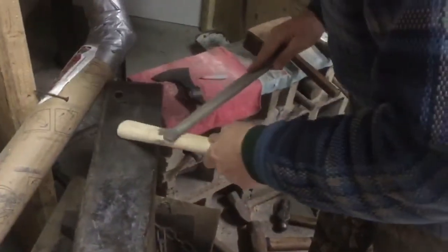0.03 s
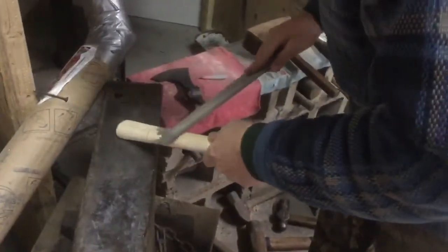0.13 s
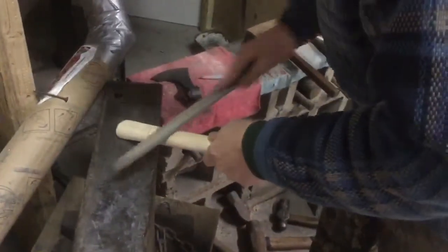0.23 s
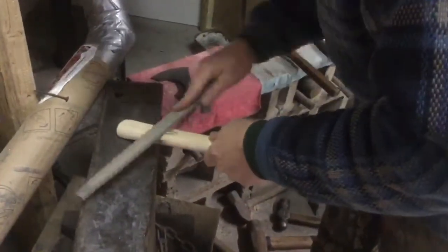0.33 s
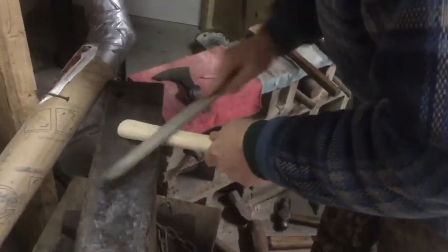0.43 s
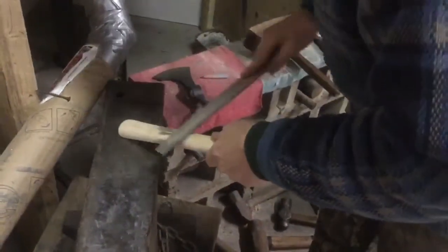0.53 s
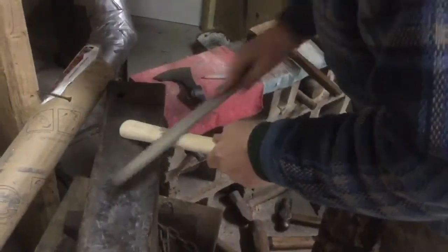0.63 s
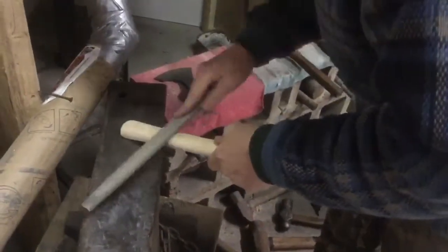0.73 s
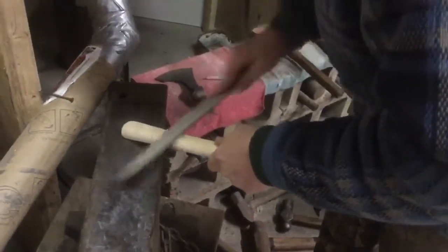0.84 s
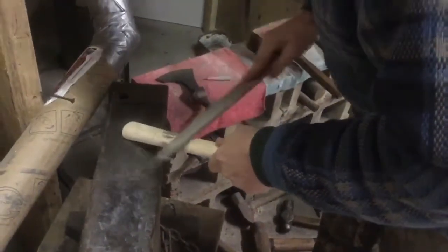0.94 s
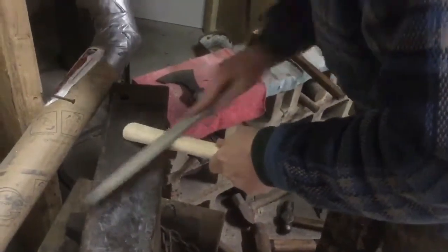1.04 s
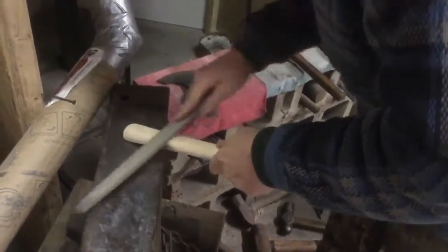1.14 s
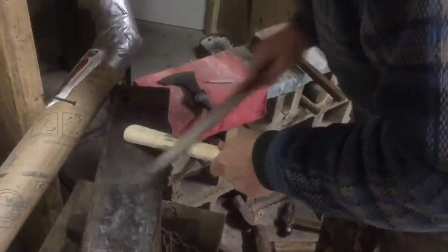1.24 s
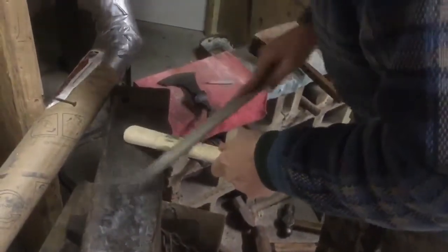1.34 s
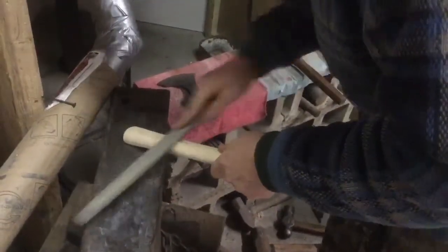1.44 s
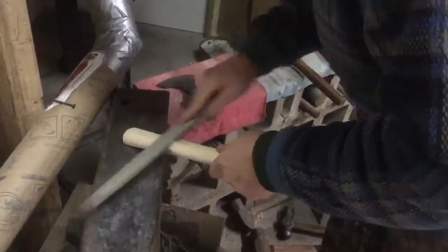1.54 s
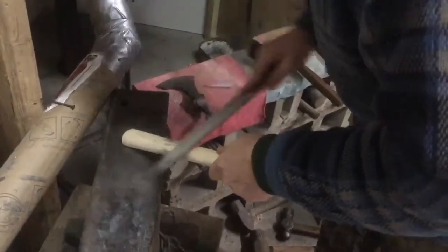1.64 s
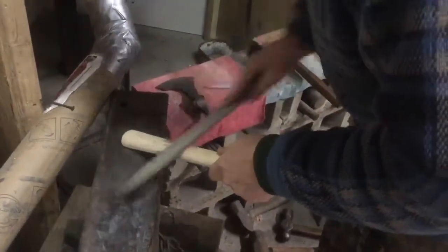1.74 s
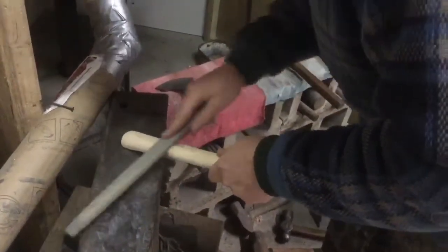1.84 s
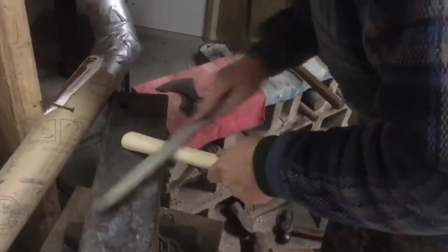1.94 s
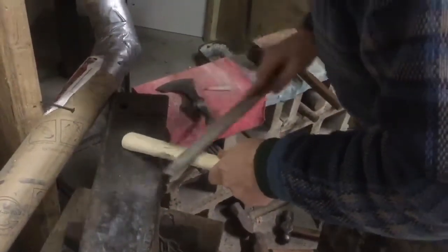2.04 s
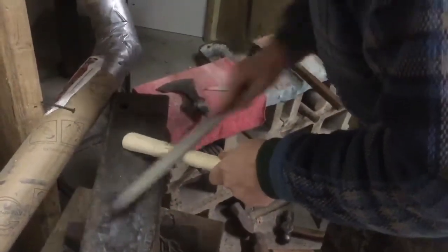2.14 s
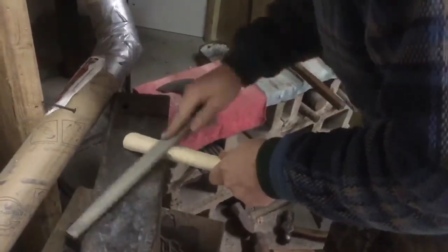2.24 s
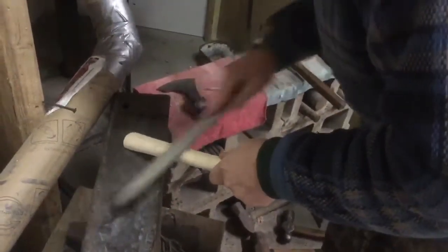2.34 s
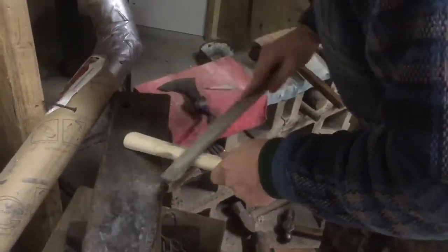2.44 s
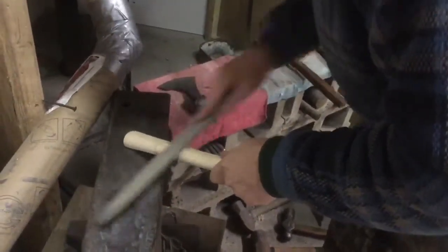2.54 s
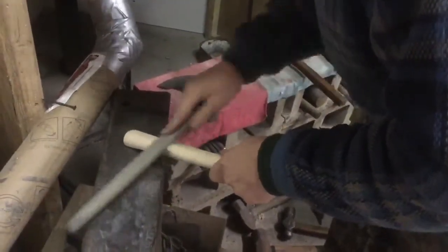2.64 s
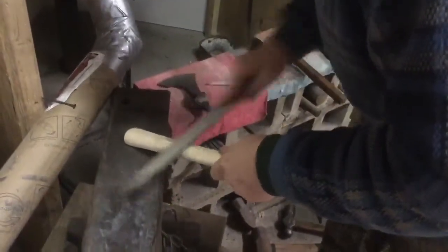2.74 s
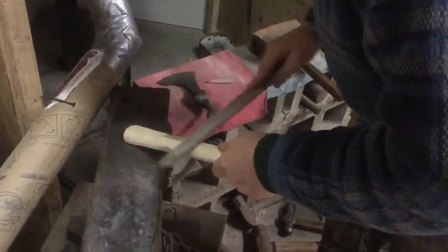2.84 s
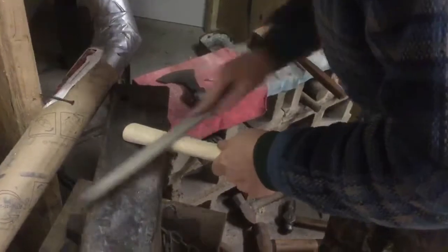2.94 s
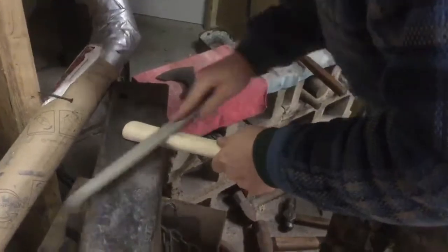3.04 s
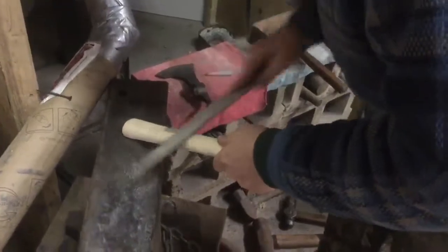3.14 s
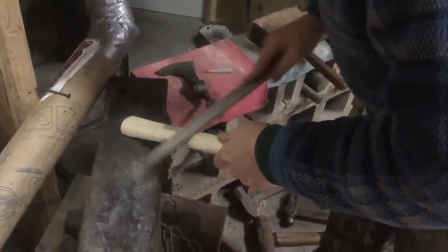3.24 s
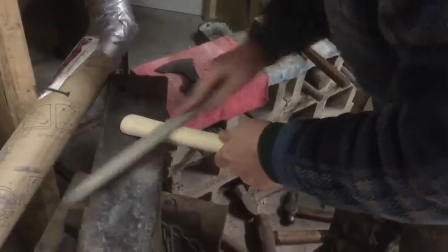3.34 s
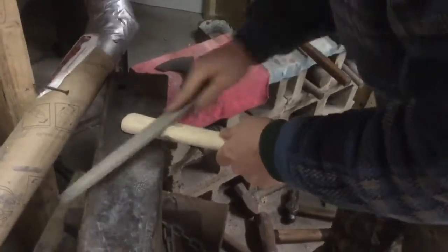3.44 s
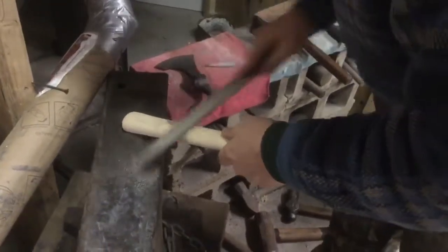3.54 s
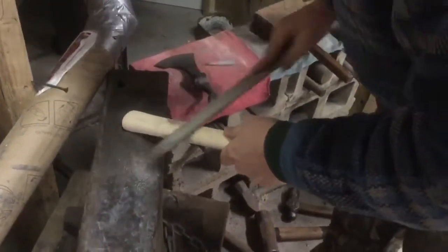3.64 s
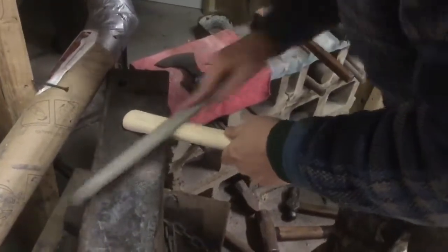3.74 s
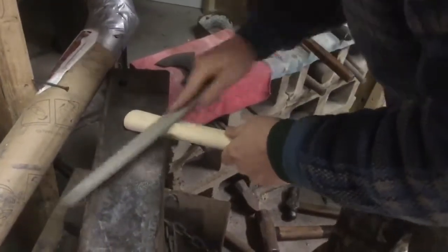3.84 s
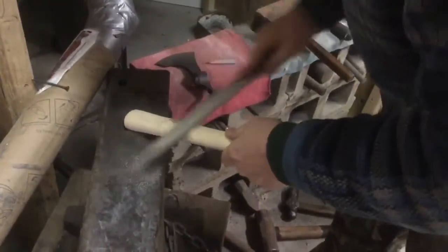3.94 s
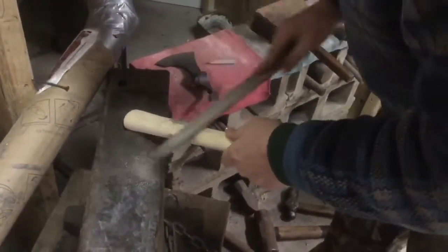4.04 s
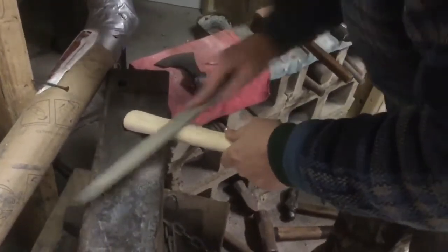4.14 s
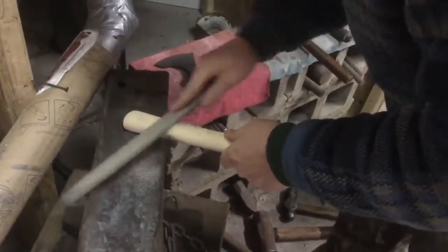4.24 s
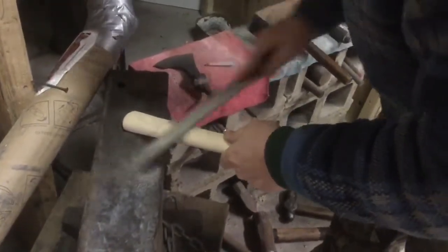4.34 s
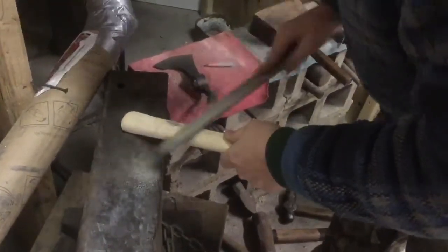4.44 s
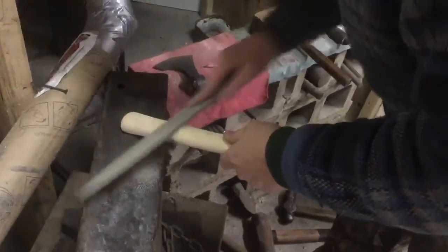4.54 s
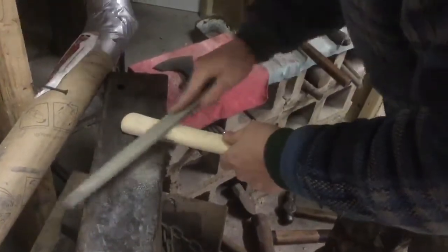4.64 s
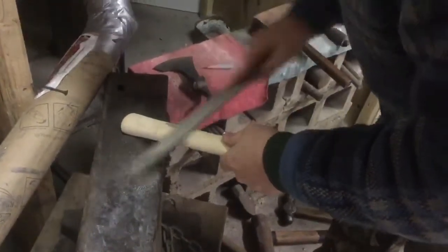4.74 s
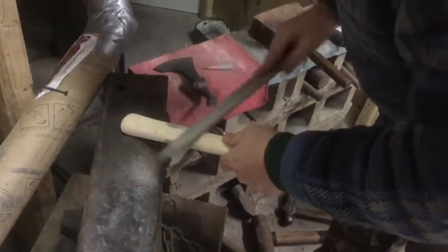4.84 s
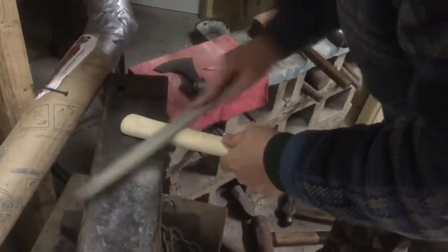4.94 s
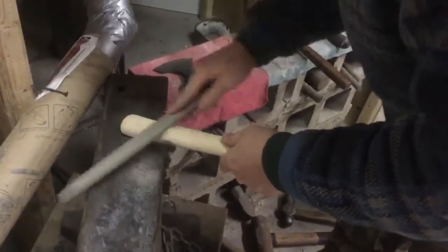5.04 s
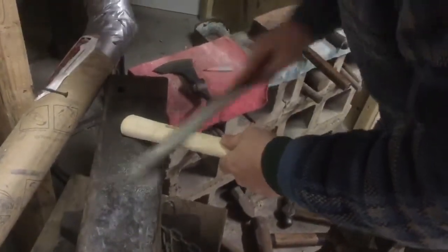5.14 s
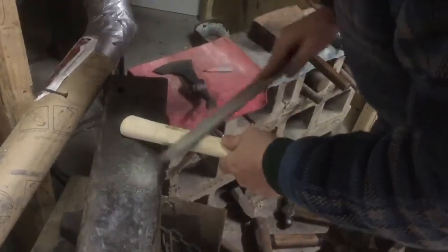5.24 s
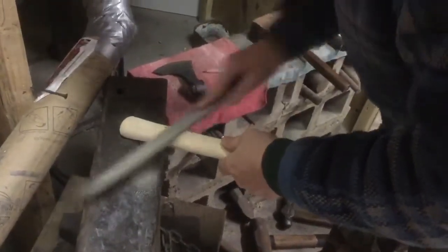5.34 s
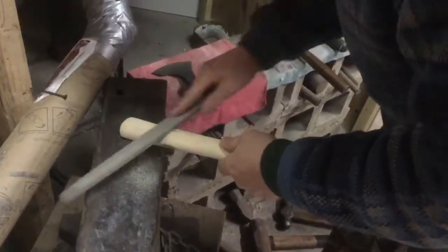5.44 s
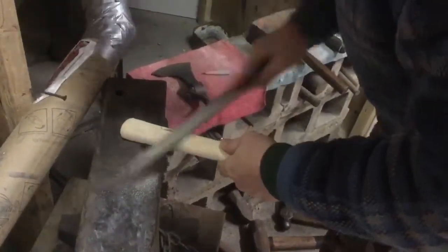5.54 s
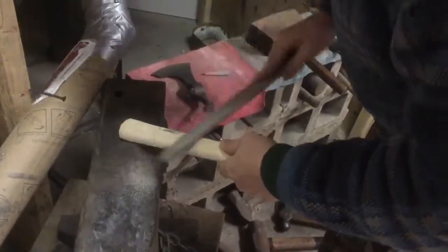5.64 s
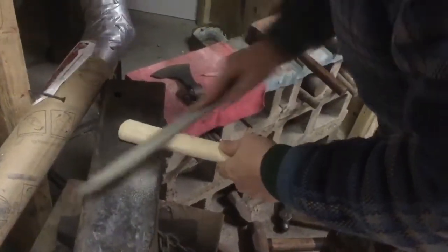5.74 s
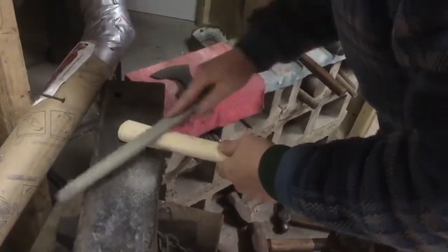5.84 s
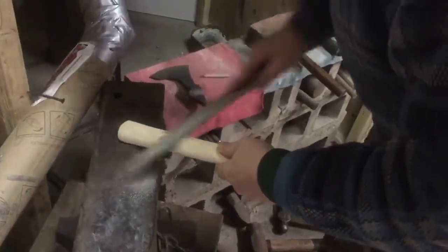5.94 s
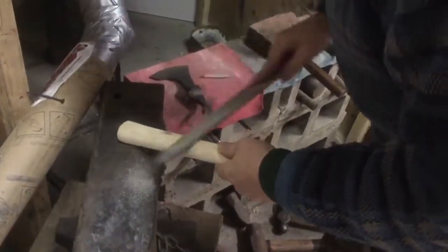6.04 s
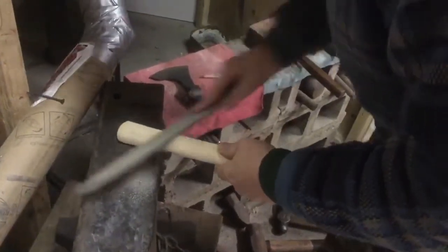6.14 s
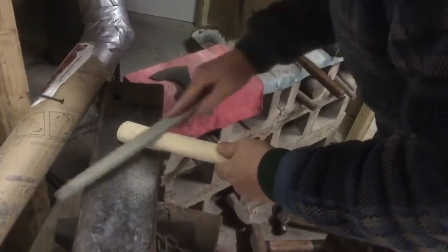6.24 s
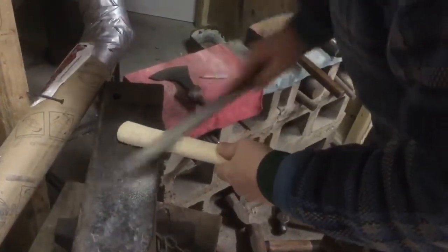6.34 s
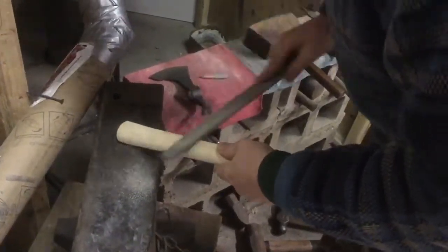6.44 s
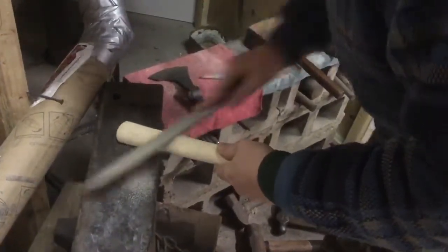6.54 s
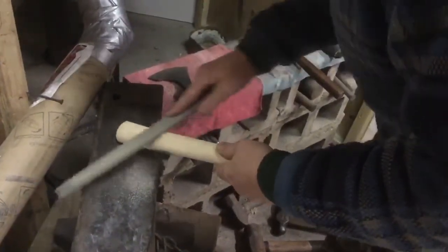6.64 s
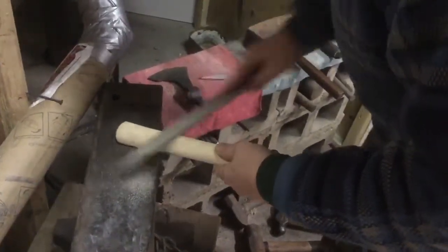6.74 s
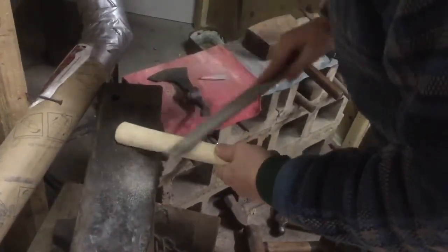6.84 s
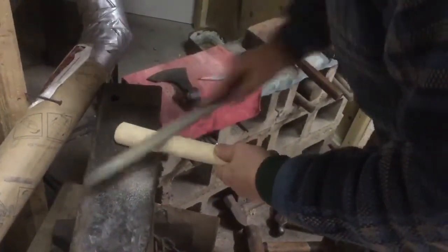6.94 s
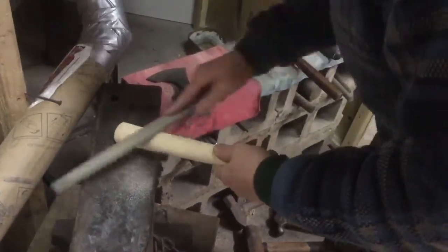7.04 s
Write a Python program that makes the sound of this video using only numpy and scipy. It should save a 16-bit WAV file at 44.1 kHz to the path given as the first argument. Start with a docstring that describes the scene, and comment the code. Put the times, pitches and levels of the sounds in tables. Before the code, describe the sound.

Close, steady strokes of a steel file scraping wood in a small workshop, alternating loud and soft, with occasional tiny squeaks.

```python
"""Filing a wooden handle

A small workshop, one microphone close to the anvil, where a long hand file rasps to and fro over a
wooden handle. The teeth bite in and tear fibres, hard on the push and lighter on the pull; handle and
steel blade ring with them. The file is first set down with a tap; now and then its teeth catch in step
and chirp. Underneath, the handle bumps and rolls on the anvil, and the room murmurs faintly."""
import sys
import numpy as np
from scipy import signal
from scipy.fft import rfft, irfft, next_fast_len
from scipy.io import wavfile
from scipy.ndimage import uniform_filter1d

SR = 44100
rng = np.random.default_rng(int(sys.argv[2]) if len(sys.argv) > 2 else 0)


def dump(signal):
    """Clip the signal to [-1, 1] and save it as 16-bit WAV at the path in sys.argv[1]."""
    limited = np.clip(np.atleast_2d(signal).T, -1, 1)
    pcm = np.round(limited * 32767).astype(np.int16)
    wavfile.write(sys.argv[1], SR, pcm)


N = 313110
TIME = np.arange(N) / SR
FFT_SIZE = next_fast_len(N + SR)
HZ = np.maximum(np.arange(FFT_SIZE // 2 + 1) * SR / FFT_SIZE, 1)

# The strokes, push and pull in turn. Each row: start in seconds, level in dB, pressure gained from
# start to end in dB, lift of the blade's note near 1 kHz in dB.
FILE_STROKES = [(.122, -23, -3, 4.5), (.394, -31.5, -2, 1), (.576, -22.5, 0, 1.5), (.776, -31.5, -1, -0.5),
                (.951, -20.5, -4.5, 0.5), (1.142, -29.5, -5, 6), (1.318, -22.5, -10.5, 1),
                (1.516, -30.5, -2.5, -0.5), (1.7, -21, -4.5, -1), (1.895, -31, 0.5, 3.5),
                (2.078, -22.5, -8, 2.5), (2.283, -31.5, 3, 3), (2.457, -23.5, -7, 5),
                (2.658, -31.5, -2.5, -5), (2.85, -22.5, -7, 1), (3.048, -29.5, 3, -3),
                (3.229, -24.5, -5.5, -1), (3.436, -30.5, -4, -12.5), (3.631, -22.5, -8, -2),
                (3.841, -31, -8.5, -5), (4.036, -22, -3.5, 1), (4.241, -30.5, -4, -6),
                (4.439, -23.5, -2.5, 2.5), (4.647, -29.5, 2, -10), (4.84, -24, 2, -1),
                (5.046, -28, 3, -11.5), (5.239, -23.5, -7, 1), (5.45, -29.5, -1.5, -7.5),
                (5.647, -23.5, -1.5, 2.5), (5.848, -30.5, 5, -5.5), (6.042, -23, -3.5, -1),
                (6.251, -30, 0.5, -14), (6.447, -22.5, -7.6, -1), (6.658, -30, 1.5, -7.5),
                (6.856, -22.5, -0.5, -2), (7.062, -25, 9, -3)]
# The arm's gesture, push first, then pull. Each row: attack as a share of the stroke, its curve as an
# exponent, release as a share, its exponent, share of the stroke gone at top speed.
ARM_GESTURES = [(0.69, 0.96, 0.39, 1.22, .48), (0.56, 0.62, 0.16, 1.84, .53)]
# How pushes and pulls change as the work goes on. Each row: time in seconds, teeth per second at top
# speed, handle rumble in dB, lift near 2 kHz in dB, brightness in dB per octave.
PUSH_CHARACTER = [(.25, 680, -10.5, -3.5, -2.4), (1.4, 896, -8.5, 2.5, -0.8), (2.6, 904, -11.5, 1.5, -1.5),
                  (3.8, 860, -5.5, -0.5, -1.1), (5.35, 730, -2, 0, -0.4), (7, 710, -1.5, -3, -0.9)]
PULL_CHARACTER = [(.5, 1071, 2.5, -1, 1), (1.25, 1063, 2.5, 0.93, 0.95), (2.4, 1033, 1, 0.88, 1.7),
                  (3.5, 1010, 1.5, 1, 1.2), (4.7, 962.4, 2, 0.053, 0.37), (5.9, 949, 2, -1.96, 1.1),
                  (6.9, 1018, 3, -1.62, 1.92)]
# Broad colour of tearing fibres. Each row: frequency in Hz, relative level in dB on push, then on pull.
FIBRE_COLOUR = [(50.0, -101, -85), (127, -64, -74), (307, -58.5, -57.5), (410, -69, -69),
                (823, -64.5, -71.5), (1434, -57, -54.5), (2690, -44, -43), (4360, -31.5, -36),
                (5500, -47, -48.5), (7160, -53.5, -63.5), (9600, -66, -74.5), (12000.0, -69, -84),
                (15500.0, -75, -110.3)]
# Modes of handle and blade. Each row: frequency in Hz, width in Hz, lift in dB on push, then on pull.
WORK_MODES = [(156.6, 23.6, 17.5, -3), (308.3, 44, 12, 7), (574, 76.2, 24.5, 17.5), (997, 79, 4, 30),
              (1138, 136, 10.5, 2), (1479, 53, 10.5, 9), (1750, 131, 14.5, 4), (2085, 218, 4, 11.5),
              (2335, 172, 8, -4.5), (3130, 240, 3, 4.5), (3540, 370, 5, 2), (3900, 125, -3.5, 6),
              (4314, 153, -23, -6), (4350, 36, 4, 9), (6048, 197, 11, 10.5), (7133, 234, 9, 18),
              (7660, 110, 7, 4.5), (8130, 85, 13, 16), (8820, 150, 11, 11), (10177, 200, 10.5, 12.5),
              (12430, 300, 10, 12.5), (14500, 470, 8, 22.5)]
# Blade resonances that swell as the contact slides over their belly. Each row: frequency in Hz,
# width in Hz, share of the stroke gone at the swell, lift in dB.
PUSH_BLADE_MODES = [(1174, 90, 0.11, 6.5), (1450, 116, 0.42, 7), (1730, 37, 0.66, 2.5),
                    (2386, 160, 0.14, 12), (2556, 230, 0.46, 8), (3770, 570, 0.59, 2), (3980, 220, 0.76, 6),
                    (4480, 480, 0.04, 10), (4890, 82, 0.95, 7)]
PULL_BLADE_MODES = [(990, 70, 0.83, 5.2), (2048, 130, 0.7, 10.1), (2550, 160, 0.54, 10.8),
                    (2896, 140, .27, 10.8), (3695, 220, 0.85, 8.1), (4300, 140, 0.26, 8)]
# Teeth catching in step. Each row: start and end in seconds, first, middle and last pitch in Hz,
# level in dB.
TOOTH_CHIRPS = [(0.239, 0.338, 1516, 1340, 1126, -34.5), (.330, 0.353, 1900, 1780, 1610, -37.5),
                (.640, 0.708, 1372, 1514, 1460, -48), (1.042, 1.101, 2687, 2308, 1700, -31),
                (1.203, 1.251, 997, 1030, 1070, -36), (1.428, 1.47, 2780, 2380, 1560, -24),
                (1.804, 1.866, 2476, 2269, 1746, -40), (2.339, 2.434, 2350, 2637, 1814, -35.5),
                (2.501, 2.549, 2120, 2430, 2507, -27), (2.787, 2.817, 2380, 2045, 1750, -30.5),
                (3.281, 3.33, 1525, 1461, 1412, -41), (3.335, 3.382, 1722, 1824, 1995, -32),
                (3.909, 4.033, 934, 1036, 1160, -44), (6.078, 6.206, 1558, 1428, 1456, -39)]
# The file knocks on the wood. Each row: time in seconds, peak in dB.
FILE_TAPS = [(0.0321, -15), (0.068, -36), (2.739, -29)]
# The handle shifts on the anvil. Each row: time in seconds, peak in dB, pitch in Hz.
HANDLE_BUMPS = [(0.874, -48, 169.6), (2.985, -48, 187.7), (3.479, -38.5, 207.7)]


def rasp(push_db, pull_db, zip_db, judder_db):
    """The file, close up: buzzing teeth and tearing fibres set handle and blade ringing."""
    stroke, gone, speed = arm()
    top_tooth_hz, *tone_trends = trends(stroke)
    bite_db = bite(stroke, gone, waver_db=0.93, waver_hz=22, turn_db=-47, settle_s=.1, settle_db=-14)
    pushing = uniform_filter1d(1. - stroke % 2, size=400)
    pulling = 1 - pushing
    phase, buzz = tooth_buzz(top_tooth_hz * speed, jitter=0.01593, buzz_db=-13, fall_db=2, flutter_db=4.5)
    snaps = fibres(speed, phase, snaps_per_s=6000, spread_db=2, hiss_db=-1, tooth_depth=0.21)
    tearing = buzz * np.sqrt(speed) + snaps
    drive = stroke_tone(tearing, stroke, speed, pushing, bite_db, tone_trends, patchy_db=1.76)
    drive = drive * from_db(bite_db + judder_db * drift(83))
    push = filtered(drive * pushing, work_response(direction=0))
    pull = filtered(drive * pulling, work_response(direction=1))
    push = blade(push, PUSH_BLADE_MODES, stroke, gone, reach=.22, detune=.032, scatter_db=3, glide=.21)
    pull = blade(pull, PULL_BLADE_MODES, stroke, gone, reach=.16, detune=.045, scatter_db=5.5, glide=.16)
    whine = zipping(gone, top_hz=4360, top_share=0.42, sag_hz=380, width_hz=130, from_s=3.9, full_s=7.7)
    return from_db(push_db) * push + from_db(pull_db) * pull + from_db(zip_db + bite_db) * pulling * whine


def arm():
    """Stroke number, share of it gone, and speed 0-1: still at each turn, fastest near halfway."""
    turns = np.array(FILE_STROKES)[:, 0]
    turns = np.append(turns, turns[-1] + np.mean(np.diff(turns)))
    travel = np.interp(TIME, turns, np.arange(len(turns)))
    stroke, gone = travel.astype(int), travel % 1
    skew = np.log(.5) / np.log(np.array(ARM_GESTURES)[:, -1])
    return stroke, gone, np.sin(np.pi * gone ** skew[stroke % 2])


def trends(stroke):
    """The slowly changing tooth rate and tone of the push or the pull, whichever is under way."""
    def follow(table):
        times, *columns = np.transpose(table)
        return [np.interp(TIME, times, column) for column in columns]
    return np.where(stroke % 2, follow(PULL_CHARACTER), follow(PUSH_CHARACTER))


def bite(stroke, gone, waver_db, waver_hz, turn_db, settle_s, settle_db):
    """How hard the teeth bite, in dB: the wavering hand bears down, then lets go before the turn."""
    _, level_db, lean_db, _ = np.array(FILE_STROKES)[stroke].T
    attack, attack_curve, release, release_curve, _ = np.array(ARM_GESTURES)[stroke % 2].T
    shape = ease(gone / attack) ** attack_curve * ease((1 - gone) / release) ** release_curve
    pressure = from_db(level_db + lean_db * (gone - .5) + waver_db * drift(waver_hz))
    contact = np.hypot(pressure * shape, from_db(turn_db))   # the file still drags as it turns
    easing_in_db = settle_db * np.maximum(1 - (TIME - FILE_STROKES[0][0]) / settle_s, 0)
    return 20 * np.log10(contact) + easing_in_db


def tooth_buzz(tooth_hz, jitter, buzz_db, fall_db, flutter_db):
    """Each row of teeth plucks the wood: a rough buzz that rises and falls with the speed."""
    phase = 2 * np.pi * np.cumsum(tooth_hz * (1 + jitter * drift(151.3))) / SR
    buzz = np.zeros(N)
    for harmonic in range(1, 7):
        level_db = buzz_db - fall_db * np.log2(harmonic) + flutter_db * drift(114)
        buzz += from_db(level_db) * np.cos(harmonic * phase)
    return phase, buzz


def fibres(speed, phase, snaps_per_s, spread_db, hiss_db, tooth_depth):
    """Fibres snap at random over a fine hiss, bunched by the rows of teeth that pass."""
    snapping = rng.random(N) < snaps_per_s * (.4 + speed) / SR
    sizes = from_db(spread_db * np.minimum(rng.exponential(1, N), 4)) * rng.choice([-1, 1], N)
    snaps = rms_one(snapping * sizes / np.sqrt(0.081 + speed))
    hiss = from_db(hiss_db) * rng.standard_normal(N)
    return rms_one((snaps + hiss) * (1 + tooth_depth * np.cos(phase)))


def stroke_tone(tearing, stroke, speed, pushing, bite_db, tone_trends, patchy_db):
    """Faster teeth sound brighter; the blade's low note sounds most while the push is slow."""
    rumble_db, middle_db, tilt_db = tone_trends
    tilt_db = tilt_db + 4.5 * (speed - .8)
    bands_hz = [700, 1000, 1500, 2200, 3200, 4600, 7500, 13000]
    band_db = {hz: tilt_db * np.log2(hz / 3000) for hz in bands_hz[2:]}
    band_db[700] = rumble_db - 0.31 * (bite_db + 36.5)   # the handle rumbles even under a light touch
    band_db[1000] = np.array(FILE_STROKES)[stroke, -1] + 11.5 * pushing * (.75 - speed)
    band_db[2200] += middle_db
    band_db[13000] += 5 * (speed - .8)   # only fast teeth make the finest fizz
    out = np.zeros(N)
    for hz, weights in zip(bands_hz, np.eye(len(bands_hz))):
        band = filtered(tearing, np.interp(np.log(HZ), np.log(bands_hz), weights))
        out += band * from_db(uniform_filter1d(band_db[hz], size=400) + patchy_db * drift(27.4))
    return out


def work_response(direction):
    """Fibre colour lifted by the modes of handle and blade; direction 0 is the push, 1 the pull."""
    colour_hz, *colour_db = np.transpose(FIBRE_COLOUR)
    response = from_db(np.interp(np.log(HZ), np.log(colour_hz), colour_db[direction]))
    for hz, width_hz, *lift_db in WORK_MODES:
        response = response * (1 + (from_db(lift_db[direction]) - 1) * resonance(hz, width_hz))
    return rms_one(response)


def blade(sound, modes, stroke, gone, reach, detune, scatter_db, glide):
    """Each stroke meets the wood at a new angle, so the blade's resonances vary in pitch and strength."""
    out = sound
    for hz, width_hz, place, lift_db in modes:
        pitch, strength, slope = rng.standard_normal((len(FILE_STROKES), 3))[stroke].T
        centre_hz = hz * (1 + detune * pitch + glide * slope * (gone - place))
        # a gliding resonance: shift down to 0 Hz, smooth, shift back up
        carrier = np.exp(2j * np.pi * np.cumsum(centre_hz) / SR)
        pole = np.exp(-np.pi * width_hz / SR)
        ringing = 2 * np.real(carrier * signal.lfilter([1 - pole], [1, -pole], sound * carrier.conj()))
        belly = np.exp(-((gone - place) / reach) ** 2)
        swell = (from_db(lift_db + scatter_db * strength) - 1) * belly
        out = out + uniform_filter1d(swell, size=300) * ringing
    # the arm sets the power; the resonances only share it out
    power_in, power_out = np.abs(uniform_filter1d(np.array([sound, out]) ** 2, size=900)) + 1e-12
    return out * np.sqrt(power_in / power_out)


def zipping(gone, top_hz, top_share, sag_hz, width_hz, from_s, full_s):
    """A narrow whine that gradually comes in, its pitch arching over the stroke."""
    hz = top_hz - sag_hz * (2 * (gone - top_share)) ** 2
    roughness = drift(width_hz) + 1j * drift(width_hz)
    fade_in = ease((TIME - from_s) / (full_s - from_s))
    return fade_in * np.real(roughness * np.exp(2j * np.pi * np.cumsum(hz) / SR))


def chirps(jitter, flutter_db, overtone_db):
    """The teeth drop into their own grooves: short, rough, gliding tones."""
    out = np.zeros(N)
    waver, flutter = drift(175), from_db(flutter_db * drift(53))
    for start, end, *pitches_hz, db in TOOTH_CHIRPS:
        on = (TIME > start) & (TIME < end)
        gone = (TIME[on] - start) / (end - start)
        hz = np.polyval(np.polyfit([0, .5, 1], pitches_hz, 2), gone)
        phase = 2 * np.pi * np.cumsum(hz * (1 + jitter * waver[on])) / SR
        tone = np.sin(phase) + from_db(overtone_db) * np.sin(2 * phase)
        swell = ease(4 * gone) * ease(4 * (1 - gone))
        out[on] += np.sqrt(2) * from_db(db) * swell * flutter[on] * tone
    return out


def taps(crack_s, knock_hz, knock_width_hz, knock_db, clatter_db, clatter_s, high_cut_hz, low_cut_hz):
    """Steel meets wood: a short crack with a hollow knock in it, and a brief shudder of the handle."""
    knock = 1 + from_db(knock_db) * resonance(knock_hz, knock_width_hz)
    roll_off = 1 / (1 + 1j * HZ / high_cut_hz) ** 2 / (1 + low_cut_hz / (1j * HZ))
    response = work_response(direction=0) * knock * roll_off
    out = np.zeros(N)
    for start, db in FILE_TAPS:
        age = np.maximum(TIME - start, 0)
        force = (age > 0) * (np.exp(-age / crack_s) + from_db(clatter_db) * np.exp(-age / clatter_s))
        tap = filtered(force * rng.standard_normal(N), response)
        out += from_db(db) * tap / np.abs(tap).max()
    return out


def bumps(width_hz):
    """The handle shifts on the anvil: dull thuds, soon damped by the holding hand."""
    out = np.zeros(N)
    for start, db, hz in HANDLE_BUMPS:
        thud = filtered(signal.unit_impulse(N, round(start * SR)), resonance(hz, width_hz) ** 2)
        out += from_db(db) * thud / np.abs(thud).max()
    return out


def anvil_ring(work, hz, width_hz, level_db):
    """The anvil on its stand rings low under the strokes."""
    return from_db(level_db) * filtered(work, resonance(hz, width_hz))


def handle_roll(start_s, end_s, fade_s, hz, width_hz, level_db):
    """The anvil rumbles softly as the handle is rolled on it."""
    fade = ease(np.minimum(TIME - start_s, end_s - TIME) / fade_s)
    return from_db(level_db) * fade * noise_band(hz, width_hz, order=3)


def workshop(direct, t60_s, wet_db, wall_hz):
    """Dense, slightly dull reflections from the cluttered room reach the microphone 4 ms late."""
    age = TIME[:SR // 2]
    tail = rng.standard_normal(len(age)) * from_db(-60 * age / t60_s) * (age > .004)
    response = rfft(tail / np.linalg.norm(tail), FFT_SIZE) / (1 + 1j * HZ / wall_hz)
    return direct + from_db(wet_db) * filtered(direct, response)


def room_tone(murmur_db, hiss_db):
    """Far behind the work, a faint low murmur with a trace of hiss."""
    murmur = noise_band(hz=205, width_hz=196, order=2)
    hiss = noise_band(hz=970, width_hz=2200, order=3)
    return from_db(murmur_db) * murmur + from_db(hiss_db) * hiss


def from_db(db):
    """Decibels to gain."""
    return 10 ** (np.asarray(db) / 20)


def rms_one(x):
    """Scale to unit rms."""
    return x / np.sqrt(np.mean(np.abs(x) ** 2) + 1e-20)


def ease(share):
    """A rounded ramp from 0 to 1."""
    return np.sin(np.pi / 2 * np.clip(share, 0, 1))


def filtered(sound, response):
    """Pass a sound through a frequency response."""
    return irfft(rfft(sound, FFT_SIZE) * response, FFT_SIZE)[:N]


def resonance(hz, width_hz):
    """Response of one damped mode, 1 at its top."""
    return 1 / (1 + 1j * (HZ ** 2 - hz ** 2) / (HZ * width_hz))


def noise_band(hz, width_hz, order):
    """Noise passed `order` times through one resonance, at unit rms."""
    return rms_one(filtered(rng.standard_normal(N), resonance(hz, width_hz) ** order))


def drift(rate_hz):
    """A smooth random wander at unit rms."""
    return rms_one(filtered(rng.standard_normal(N), 1 / (1 + 1j * HZ / rate_hz) ** 2))


def scene():
    """One microphone by the anvil: file and handle in front, the small room behind."""
    work = rasp(push_db=-3.28, pull_db=-3, zip_db=-6.5, judder_db=0.5)
    work += chirps(jitter=0.021, flutter_db=4, overtone_db=-22)
    work += taps(crack_s=0.0019, knock_hz=2060, knock_width_hz=900, knock_db=15,
                 clatter_db=-25, clatter_s=0.045, high_cut_hz=2250, low_cut_hz=250)
    work += bumps(width_hz=146)
    work += anvil_ring(work, hz=295, width_hz=3.9, level_db=1.5)
    work += handle_roll(start_s=2.7, end_s=4, fade_s=0.29, hz=130, width_hz=190, level_db=-68.5)
    at_microphone = workshop(work, t60_s=0.11, wet_db=-9, wall_hz=7000)
    at_microphone += room_tone(murmur_db=-66.5, hiss_db=-70)
    return at_microphone[None]


def record(dry):
    """A mono take, cut steeply above 15.7 kHz."""
    return signal.sosfilt(signal.ellip(10, .1, 80, 15700, fs=SR, output="sos"), dry)


dry = scene()
out = record(dry)
dump(out)
```